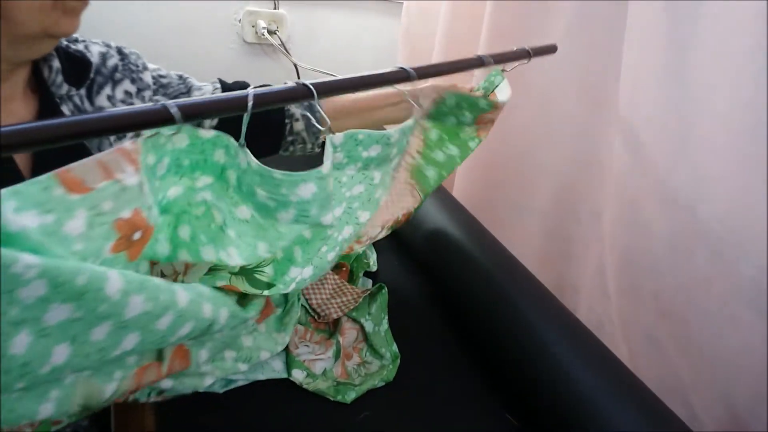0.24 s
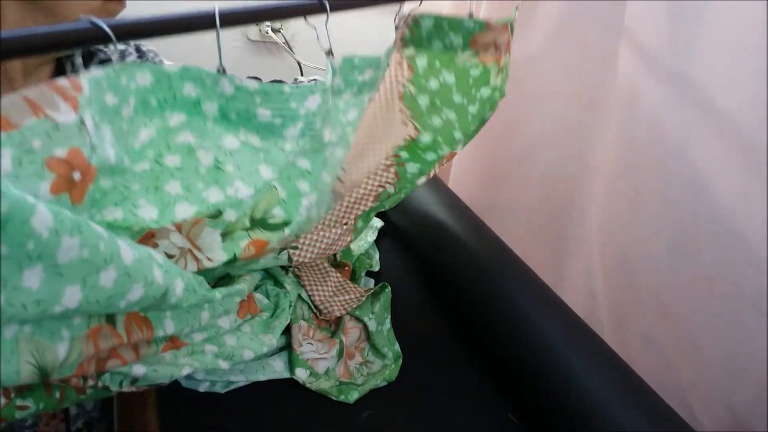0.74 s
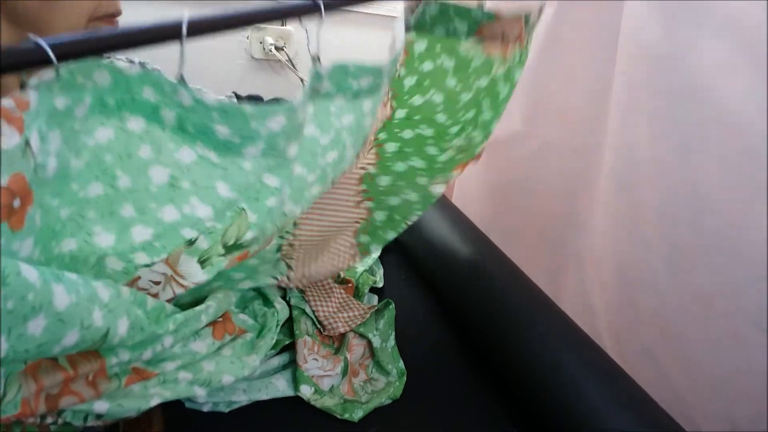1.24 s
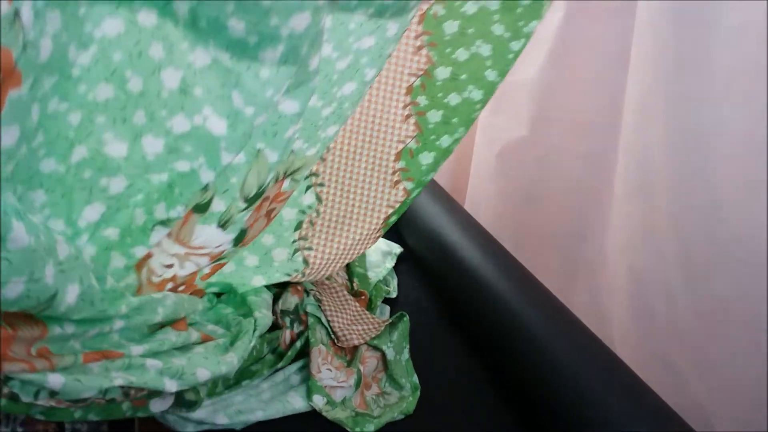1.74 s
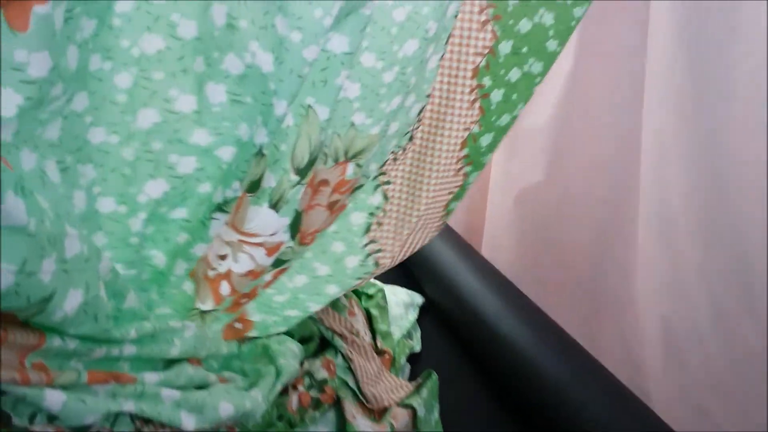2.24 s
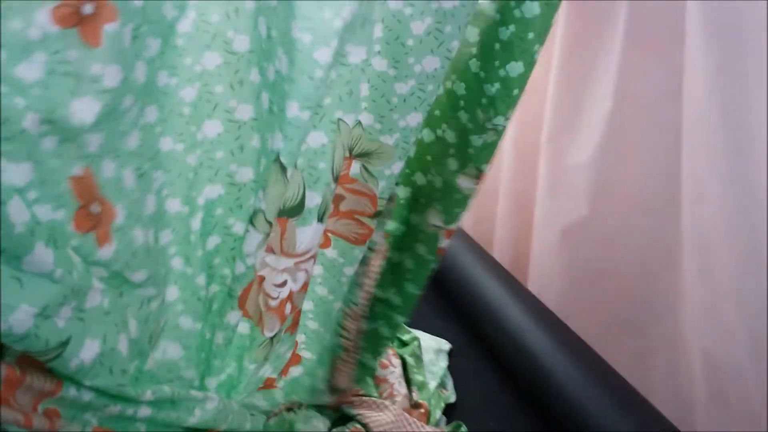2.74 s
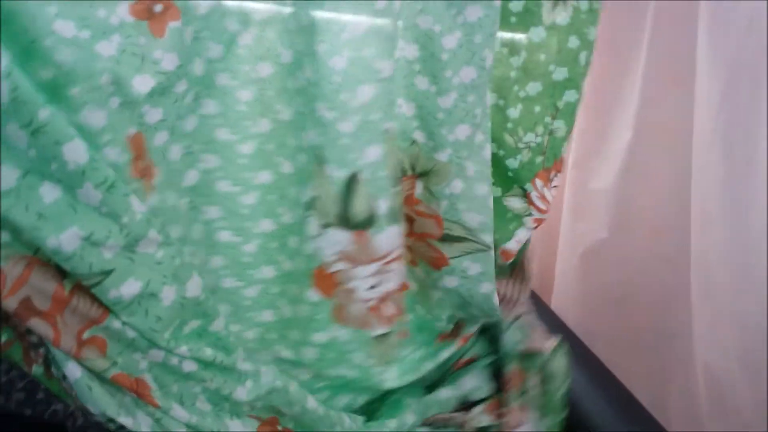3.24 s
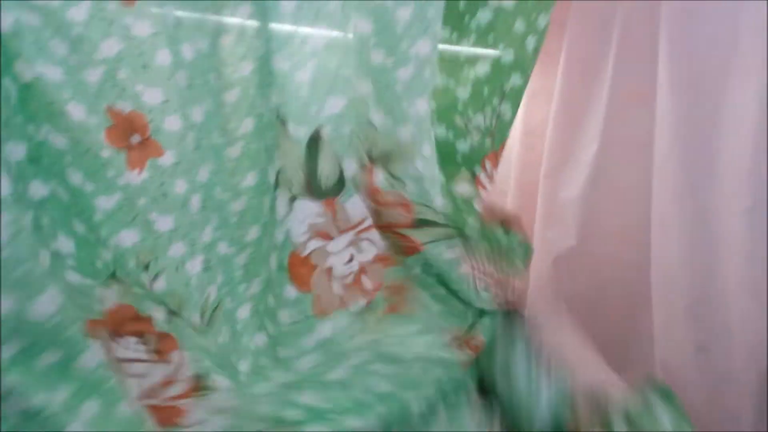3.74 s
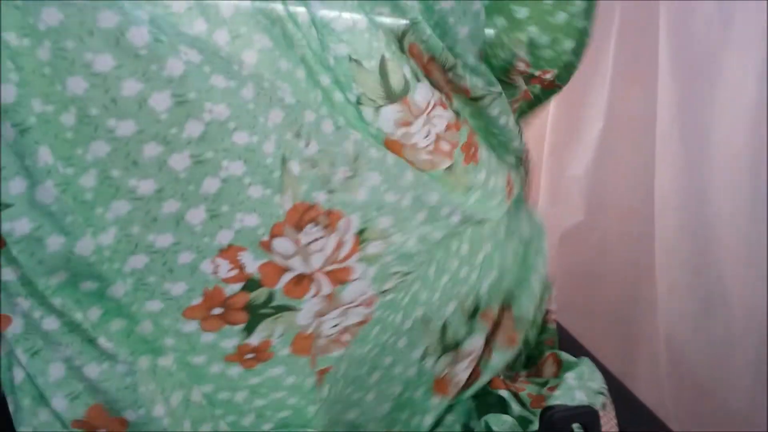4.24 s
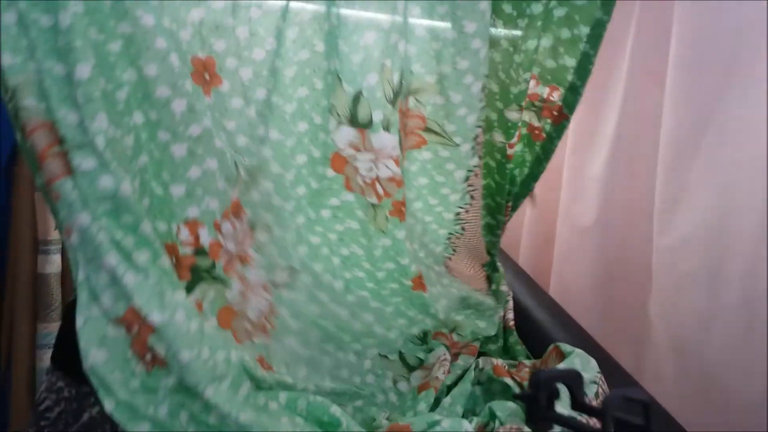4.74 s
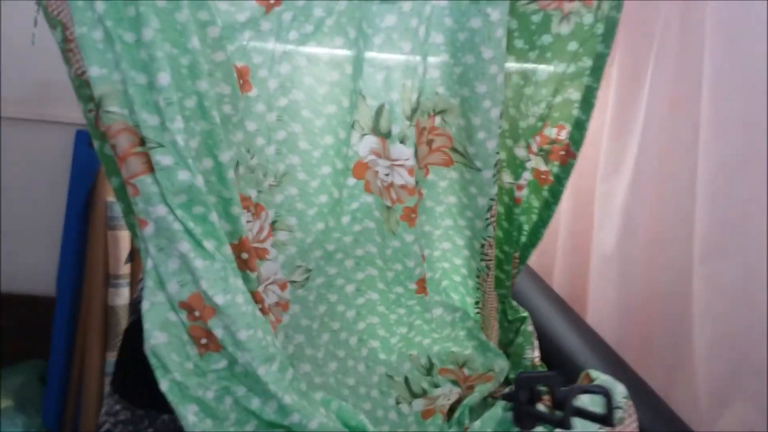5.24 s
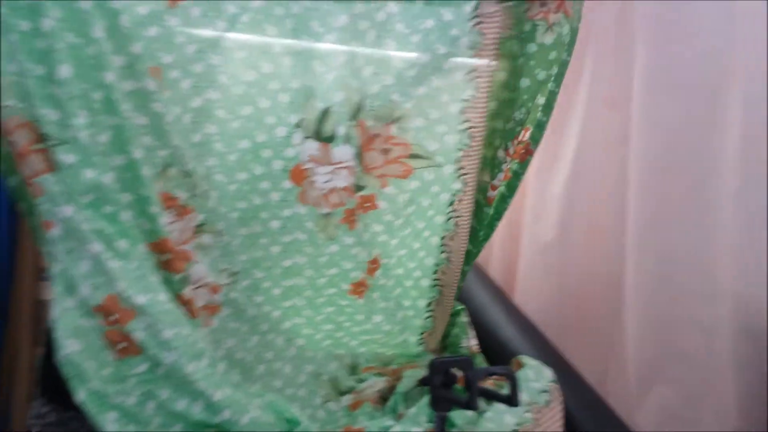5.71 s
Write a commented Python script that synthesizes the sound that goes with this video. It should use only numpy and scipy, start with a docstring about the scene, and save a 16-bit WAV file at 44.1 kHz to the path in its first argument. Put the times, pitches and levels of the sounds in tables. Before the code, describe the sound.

In a small, quiet room, close to the microphone, a curtain is pushed along a metal rod in three short pulls: one at the start, one near the middle and one at the end. The hooks rasp as they slide and clink lightly as they catch. Between the later pulls, folds of cloth brush softly over each other among a few dry clicks. A faint low hum continues underneath.

```python
"""Curtain hooks on a metal rod

A curtain on wire hooks is pushed along a thin rod in a small, quiet room. Stick-slip friction makes
each hook chatter as it slides, and an impact makes it clink as it catches; hook and rod ring together.
The cloth swishes as it is spread out, among a few dry clicks and over the faint hum of a motor."""
import sys
import numpy as np
from scipy import signal
from scipy.fft import rfft, irfft, next_fast_len
from scipy.io import wavfile

SR = 44100
rng = np.random.default_rng(int(sys.argv[2]) if len(sys.argv) > 2 else 0)


def wrap_up_sound(samples):
    """Save the sound to the file named by the first command line argument, as 16-bit audio."""
    columns = np.atleast_2d(samples).T
    # keep every value between -1 and 1, then stretch to whole-number steps
    tamed = np.clip(columns, -1, 1)
    steps = np.round(tamed * 32767).astype(np.int16)
    wavfile.write(sys.argv[1], SR, steps)


N = 263532
TIME = np.arange(N) / SR

# Overall colour of the dense metallic ring, as heard: frequency_hz, level_db
RING_COLOUR = [(300, -16), (700, -2), (1170, -5.5), (1550, -5), (2300, -6.5), (3050, -7), (3400, -0.5),
               (4200, -10.5), (5500, -5.5), (7300, -4), (8000, -7.5), (8750, -13), (9300, -3),
               (11000, -2.5), (13000, -4.5), (15600, -9)]


def slides():
    """Sliding friction: in a long pull the hook grinds as it drags and hisses as it runs."""
    # One curve for each pull: time_s, scrape_db, relative_grind_db
    pulls = [
        [(.12, -44.5, -0.5), (.18, -43, -14), (.22, -47, -11), (.26, -44, -11), (.293, -43.5, -2.5),
         (.335, -43.5, -10.5), (.37, -48.5, -7), (.42, -46.5, -9), (.46, -47.5, -5.5)],
        [(.45, -48, -7), (.525, -45.5, -8), (.6, -56.5, -8), (.7, -74, 1)],
        [(2.37, -78, -1), (2.43, -58, -0.5), (2.48, -51.5, 1.5), (2.53, -49.5, -1), (2.585, -50.5, -4),
         (2.62, -44.5, -8.5), (2.68, -45.5, -9), (2.77, -46, -5), (2.82, -53, -3.5), (2.95, -49.5, -8),
         (3.05, -66.5, -2), (3.2, -71.5, 4)],
        [(5.455, -51, -8), (5.48, -54.5, -5), (5.54, -46, -15), (5.585, -46, -4.5), (5.62, -41.5, -19),
         (5.67, -53, -6), (5.73, -53.5, -20), (5.8, -60.5, -9), (5.9, -60, -11)],
    ]
    out = np.zeros(N)
    for pull in pulls:
        times, db, grind_db = np.transpose(pull)
        t = np.arange(times[0], times[-1], 1 / SR)
        out += scrape(times[0], amp(np.interp(t, times, db)), np.interp(t, times, grind_db), contacts=12)
    return out


def nudges():
    """Brief friction: a hook shifts a little, and its scrape swells and fades."""
    # Small hook movements: peak_s, rise_s, fall_s, scrape_db, relative_grind_db
    shifts = [(.083, 0.026, 0.019, -58.5, 0.5), (.295, 0.0076, 0.012, -42.5, -0.5),
              (.33, .005, 0.017, -41.5, -6.5), (1.309, 0.021, 0.06, -62.5, -5),
              (1.451, 0.072, 0.064, -62, -5), (4.04, 0.043, 0.053, -57.5, 0), (4.439, .03, 0.032, -56, -5),
              (4.609, .04, 0.07, -62, -6), (4.895, .05, 0.048, -62, -11),
              (5.464, 0.0063, 0.0082, -45.5, -11), (5.918, .025, 0.039, -56, -7.5)]
    out = np.zeros(N)
    for peak_s, rise_s, fall_s, db, grind_db in shifts:
        t = np.arange(max(peak_s - 2 * rise_s, 0), peak_s + 2 * fall_s, 1 / SR)
        out += scrape(t[0], amp(db) * swell(t, peak_s, rise_s, fall_s), grind_db, contacts=4)
    return out


def scrape(start_s, level, grind_db, contacts):
    """Stick-slip excitation drives the metal at successive contact points, each with its own response."""
    size, out = len(level), np.zeros(N)
    pressure = level * amp(drift(37, SR)[:size]) * signal.windows.tukey(size, 0.04)
    slips = friction(per_s=1000, spread_db=2, smooth=0.75, size=SR)[:size] * pressure
    force_db = 20 * np.log10(level + 1e-9) + 49.5  # relative to a firm scrape
    hiss_db = -5.5 + 0.3 * force_db  # a harder pull is brighter
    place = np.linspace(0, contacts - 1, size)
    for contact in range(contacts):
        touch = np.cos(np.pi / 2 * np.minimum(abs(place - contact), 1))
        ring_db = 1 - 0.57 * np.average(force_db, weights=touch * level)  # pressing mutes the hook
        body = metal(start_s, ring_db, rod_t60=0.038, tail_db=-15, tail_t60=0.17)
        for db, band in zip((grind_db, 0, hiss_db), bands(body, edges_hz=[2500, 8000])):
            add(out, start_s, signal.fftconvolve(slips * touch * amp(db), unit_energy(band)))
    return amp(-1.94) * out


def clinks():
    """Impact excitation: a hook strikes the rod, and the harder the blow, the shorter the contact."""
    # Impacts: start_s, strength_db, tilt_db_per_octave, narrowness_db_per_octave_squared, ring_db
    impacts = [(0.1156, -49, 2, 2.5, -12), (0.1258, -35.5, 5.5, -0.2, -10), (0.4539, -34, 6.5, 3, 7),
               (0.6, -48, 7.5, 8.5, -2), (0.7639, -43, -5.5, 9, -2.5), (0.7792, -57.5, 6.5, 1, 5),
               (1.1656, -52, 4, 0, -3), (1.9879, -51, -0.5, 3.5, 1), (1.995, -49.5, -2, 5, -10),
               (2.9307, -48.5, 4, -2, 3), (2.9422, -43, 4, 2.5, 6), (3.2288, -50, -4.5, 5, 1),
               (3.916, -46, 1.5, 2, 1), (4.107, -51, 3, 7, 1), (4.4622, -46.5, 2.5, 3.5, -3),
               (5.458, -53.5, 3.5, -0.5, -2), (5.523, -46, 2.8, 3, -7), (5.6114, -54.5, 5, -2, 6),
               (5.6175, -49, 1.5, 0.5, 0), (5.836, -46.5, 6.5, 4.5, -5)]
    # Centres of a clink's four bands: frequency_hz
    centres_hz = [1700, 3400, 6200, 11500]
    pivot_hz, crack_decay_s = 4560, 0.00023
    out, t = np.zeros(N), np.arange(SR // 40) / SR
    octaves = np.log2(np.array(centres_hz) / pivot_hz)
    for start_s, db, tilt, narrowness, ring_db in impacts:
        contact_s = 0.0013 * amp(-51 - db) ** 0.84
        blow = amp(-1.5) * unit_energy(noise_burst(t, contact_s))  # buzz of the contact
        blow[0] += 1  # first touch
        body = metal(start_s, ring_db, rod_t60=0.041, tail_db=-13, tail_t60=0.44)
        ring = unit_energy(signal.fftconvolve(body, blow))
        crack = coloured(rng.standard_normal(len(t)), RING_COLOUR) * np.exp(-t / crack_decay_s)
        add(ring, 32 / SR, amp(-12.5) * unit_energy(crack))  # at the onset of the ring
        colour_db = tilt * octaves - narrowness * octaves ** 2
        for band_db, band in zip(colour_db, bands(ring, edges_hz=[2500, 4500, 8500])):
            add(out, start_s, amp(db + band_db) * band / np.std(band[:SR // 50]))
    return amp(-7.5) * out


def metal(start_s, ring_db, rod_t60, tail_db, tail_t60):
    """Modal superposition: the impulse response of one hook and the rod, with its tail in the room."""
    # Bending modes of the wire hooks, and near 3.3 kHz and 9 kHz of the rod itself: pitch_hz, t60_s, hook_0_db,
    # hook_1_db, hook_2_db, hook_3_db
    hook_modes = [(1370, 0.082, -17, -26, -16, -18), (1604, 0.022, -10.5, -18, -13.5, -22),
                  (2005, 0.058, -17, -34, -26.5, -28), (2160, 0.028, -28, -29, -20, -29),
                  (2463, 0.11, -17, -16, -20.5, -30), (2725, .05, -22, -28, -16, -26),
                  (2856, 0.062, -8.5, -14, -20, -16), (3245, 0.19, -12.5, -11, -13.5, -7),
                  (3327, .1, -9.5, -15, -14.5, -8.5), (3420, 0.18, -12.5, -20, -12, -11.5),
                  (3580, 0.066, -25, -12, -27, -13), (3898, .04, -19, -10.5, -20.5, -15.5),
                  (4463, 0.078, -15.5, -14, -17.5, -19.5), (5094, .05, -15.5, -20, -23, -18),
                  (5420, 0.019, -16, -12, -15.5, -19), (5990, 0.069, -14.5, -19, -22.5, -16.5),
                  (6310, .07, -16, -22, -16, -23), (6880, 0.045, -23, -22, -17.5, -18),
                  (7480, 0.035, -36, -9.5, -30, -25), (9020, 0.12, -20, -15.5, -13, -13.5),
                  (9260, 0.022, -9, -14, -9.5, -20), (10170, 0.033, -19, -25, -13, -21),
                  (10460, 0.064, -25, -26, -13, -18), (12000, 0.025, -20, -29, -32, -19)]
    # Moments when another hook meets the rod: time_s
    handovers = [.435, .7, .9, 1.7, 2.2, 3.1]
    # The hook that sounds before, between and after those moments: hook_index
    hook_order = [0, 1, 0, 2, 3, 2, 3]
    split_hz, radiation_hz = 11, 1060  # the thin rod radiates little below radiation_hz
    t = np.arange(SR // 6) / SR
    hz, t60, *hook_db = np.transpose(hook_modes)[:, :, None]
    hook = hook_order[np.searchsorted(handovers, start_s)]
    # Level and pitch vary with the point of contact.
    db = hook_db[hook] + 2 * rng.standard_normal(hz.shape)
    hz = hz * (1 + 0.0054 * rng.standard_normal(hz.shape))
    # A bent wire swings in two planes, so each mode is a close pair.
    pairs = sum(np.sin(2 * np.pi * ((hz + side * split_hz) * t + rng.random(hz.shape)))
                for side in (-1, 1))
    modes = pairs * dying(t, t60)
    wire = (amp(db) * modes / np.linalg.norm(modes, axis=1, keepdims=True)).sum(0)
    rod_decay = dying(t, rod_t60) + amp(tail_db) * dying(t, tail_t60)
    dense_ring = coloured(rng.standard_normal(len(t)), RING_COLOUR) * rod_decay
    body = np.pad(unit_energy(dense_ring) + amp(ring_db) * wire, (32, 0))
    return shaped(body, lambda f: 1 / (1 + (radiation_hz / f) ** 4))


def cloth():
    """Friction noise of fabric: the whole curtain stirs, and single folds sweep over one another."""
    # Stirring of the curtain: time_s, level_db
    stir = [(0, -68), (1.0, -71.5), (2.3, -71.5), (3.1, -60), (3.55, -64), (4.35, -59), (4.77, -66.5),
            (5.2, -73), (5.65, -58), (5.97, -69.5)]
    # Sweeping folds: peak_s, rise_s, fall_s, level_db, focus_hz, falloff_db_per_octave
    sweeps = [(0.849, 0.2, 0.1, -71.5, 9000, 2), (1.45, 0.15, 0.24, -65, 12000, 2.5),
              (2.0, 0.3, 0.18, -69, 13000, 5), (3.36, 0.18, 0.22, -63, 13000, 4),
              (3.68, 0.041, 0.048, -60.5, 2520, 3), (3.89, 0.063, 0.26, -58, 12900, 2.5),
              (4.268, 0.032, 0.023, -52, 1740, 15), (4.29, 0.13, 0.036, -58, 2510, 5),
              (4.58, 0.08, 0.11, -59.5, 13100, 8.5), (4.605, 0.024, 0.056, -55.5, 1930, 5),
              (4.9, 0.069, 0.09, -60, 12500, 4), (5.348, 0.068, 0.041, -66, 2580, 7)]
    out = amp(curve(stir)) * fibres(focus_hz=810, falloff_db=-0.8, size=N)
    for peak_s, rise_s, fall_s, db, focus_hz, falloff_db in sweeps:
        t = np.arange(max(peak_s - 2 * rise_s, 0), peak_s + 2 * fall_s, 1 / SR)[:2 * SR]
        hiss = fibres(focus_hz, falloff_db, size=2 * SR)[:len(t)]
        add(out, t[0], amp(db) * swell(t, peak_s, rise_s, fall_s) * hiss)
    return out * amp(1.1 * drift(21, N))


def fibres(focus_hz, falloff_db, size):
    """Threads catch and slip in clumps, giving broadband noise whose bands flicker independently."""
    # Spectrum of rubbing cloth: frequency_hz, level_db
    spectrum = [(100, -9), (300, -1.5), (700, 3), (1500, -3.5), (2500, -5.5), (4000, -9), (6500, -12),
                (8500, -17), (12500, -16.5), (15800, -19)]
    threads = coloured(friction(per_s=1400, spread_db=1, smooth=0.97, size=size), spectrum)
    threads = unit(shaped(threads, lambda f: amp(-falloff_db * abs(np.log2(f / focus_hz)))))
    return sum(band * amp(1.1 * drift(40, size)) for band in bands(threads, edges_hz=[3200, 9500]))


def dry_clicks():
    """Heavily damped transients: dry clicks, ticks and soft bumps that do not ring."""
    # Clicks, ticks and bumps: start_s, peak_db, centre_hz, decay_s
    clicks = [(1.5200, -39.5, 2780, 0.00018), (3.6175, -42.5, 790, 0.0074), (3.828, -47, 590, 0.016),
              (3.84, -52, 193, 0.017), (4.273, -46, 1810, 0.00065), (4.59, -40.5, 1500, 0.0014)]
    out, t = np.zeros(N), np.arange(SR // 10) / SR
    for start_s, db, hz, decay_s in clicks:
        push = noise_burst(t, decay_s)
        push[0] += 3
        band_pass = signal.iirpeak(hz, Q=0.9, fs=SR)
        click = signal.lfilter(*band_pass, signal.lfilter(*band_pass, push))
        add(out, start_s, amp(db) * click / abs(click).max())
    return out


def squeak():
    """Periodic stick-slip: a hook's fast, regular slips make one thin gliding tone."""
    # Course of the squeak: time_s, pitch_hz, level_db
    glide = [(.98, 10130, -90), (1.02, 10330, -78), (1.075, 10450, -81), (1.11, 10260, -85),
             (1.16, 10220, -76)]
    times, hz, db = np.transpose(glide)
    pitch_hz = np.interp(TIME, times, hz) + 18 * drift(70, N)
    sounding = (TIME > times[0]) & (TIME < times[-1])
    return amp(np.interp(TIME, times, db)) * sounding * tone(pitch_hz)


def room_tone():
    """A motor's wavering line spectrum lies over the continuous spectrum of the room's air."""
    # Partials of the motor: pitch_hz, level_db, wander_hz
    partials = [(120, -65, 0.27), (249.8, -76.5, 4.06)]
    # Slight growth of the hum: time_s, gain_db
    growth = [(0, -1), (2.5, -1.5), (3.7, 1.5), (5.9, 2.5)]
    # Spectrum of still air: frequency_hz, level_db
    air_spectrum = [(12, -26), (20, -32), (49, -17.5), (123, -4.5), (172, -10.5), (247, -6), (408, -8.5),
                    (539, -8), (1050, -13.5), (3400, -25), (4760, -40), (6290, -28), (8550, -34),
                    (12600, -24.5), (15800, -26.5)]
    hum = sum(amp(db) * tone(hz + wander_hz * drift(6, N)) for hz, db, wander_hz in partials)
    air = unit(coloured(rng.standard_normal(N), air_spectrum))
    return hum * amp(curve(growth)) + amp(-62) * air


def friction(per_s, spread_db, smooth, size):
    """Shot noise of tiny, uneven slips over a share of smooth friction noise."""
    strengths = amp(spread_db * np.minimum(rng.exponential(1, size), 4))
    slips = strengths * np.sign(rng.standard_normal(size)) * (rng.random(size) < per_s / SR)
    return unit(unit(slips) + smooth * rng.standard_normal(size))


def noise_burst(t, decay_s):
    """White noise with exponential decay."""
    return rng.standard_normal(len(t)) * np.exp(-t / decay_s)


def tone(pitch_hz):
    """A sinusoid of unit rms whose phase is the integral of its frequency."""
    return unit(np.sin(2 * np.pi * np.cumsum(pitch_hz) / SR))


def drift(rate_hz, size):
    """Low-pass random fluctuation of unit rms."""
    return unit(shaped(rng.standard_normal(size), lambda f: 1 / (1 + (f / rate_hz) ** 4)))


def swell(t, peak_s, rise_s, fall_s):
    """A Gaussian envelope with separate rise and fall."""
    return np.exp(-((t - peak_s) / np.where(t < peak_s, rise_s, fall_s)) ** 2)


def dying(t, t60):
    """Exponential decay by 60 dB in t60 seconds."""
    return np.exp(-np.log(1000) * t / t60)


def curve(points):
    """Linear interpolation of (time_s, value) points over the scene."""
    return np.interp(TIME, *np.transpose(points))


def shaped(x, gain):
    """Zero-phase filtering by a gain given as a function of frequency."""
    size = next_fast_len(len(x) + 512)
    return irfft(rfft(x, size) * gain(np.fft.rfftfreq(size, 1 / SR) + 1), size)[:len(x)]


def coloured(x, points):
    """Filtering by (frequency_hz, gain_db) points joined on a log-frequency axis."""
    hz, db = np.transpose(points)
    return shaped(x, lambda f: amp(np.interp(np.log(f), np.log(np.maximum(hz, 1)), db)))


def bands(x, edges_hz):
    """Complementary bands that sum to the whole."""
    below = [shaped(x, lambda f: 1 / (1 + (f / edge) ** 14)) for edge in edges_hz]
    return np.diff([0 * x] + below + [x], axis=0)


def amp(db):
    """Decibels to amplitude ratio."""
    return 10 ** (np.asarray(db) / 20)


def unit(x):
    """Normalisation to an rms of one."""
    return x / np.sqrt(np.mean(x ** 2) + 1e-30)


def unit_energy(x):
    """A response of unit energy preserves the power of white noise."""
    return x / np.linalg.norm(x)


def add(mix, start_s, sound):
    """Superposition of a sound on the mix from a given time."""
    part = mix[max(round(start_s * SR), 0):][:len(sound)]
    part += sound[:len(part)]


def scene():
    """The sources sum at two close microphones of unequal treble; decorrelation widens the sound."""
    # Level difference of the microphones: frequency_hz, left_minus_right_db
    balance = [(2400, 0), (3300, -4), (4400, -5.5), (5600, -9), (6900, -6), (7900, -0.5), (8900, 0),
               (9700, 3), (11200, 3), (12000, -1)]
    # Faint diffuse treble, opposite in left and right, that widens the sound: frequency_hz, gain_db
    width_spectrum = [(100, -49.5), (1200, -48), (3000, -51), (5500, -4.5), (8000, -23), (12000, -20),
                      (15000, -43)]
    sound = slides() + nudges() + clinks() + squeak() + cloth() + dry_clicks() + room_tone()
    left = coloured(sound, [(hz, 20 * np.log10(2 / (1 + amp(-db)))) for hz, db in balance])
    right = coloured(sound, [(hz, 20 * np.log10(2 / (1 + amp(db)))) for hz, db in balance])
    t = np.arange(SR // 6) / SR
    diffuser = unit_energy(rng.standard_normal(len(t)) * dying(t, t60=0.06))
    width = coloured(signal.fftconvolve(sound, diffuser)[:N], width_spectrum)
    return np.array([left + width, right - width])


def record(dry):
    """Band limiting: a steep low-pass filter removes the highest treble."""
    low_pass = signal.firwin(601, cutoff=15850, window=("kaiser", 8), fs=SR)
    return signal.oaconvolve(dry, low_pass[None], "same")


dry = scene()
out = record(dry)
wrap_up_sound(out)
```